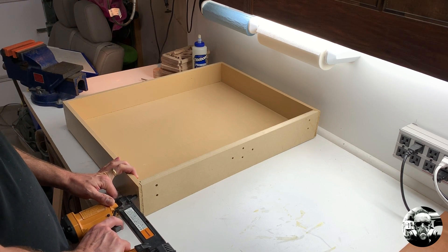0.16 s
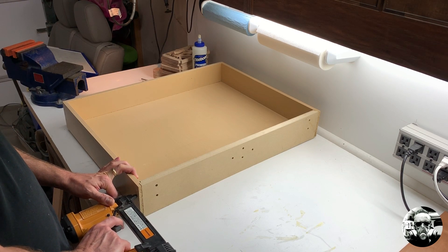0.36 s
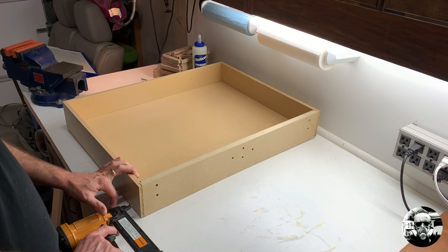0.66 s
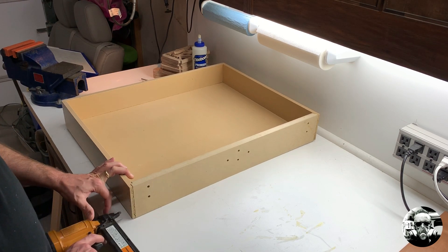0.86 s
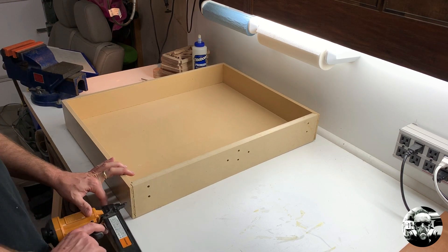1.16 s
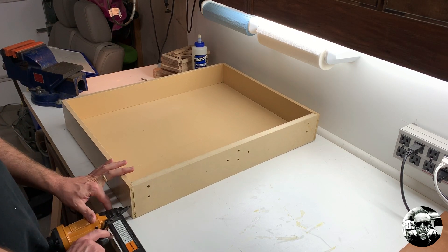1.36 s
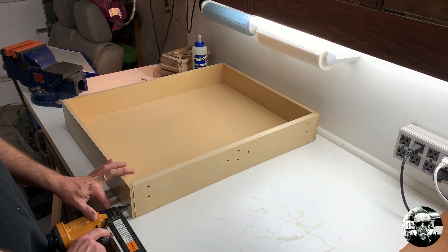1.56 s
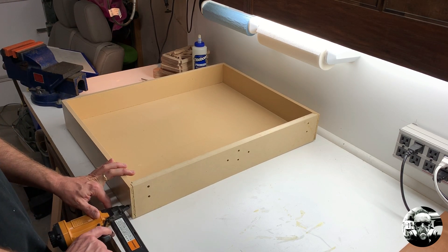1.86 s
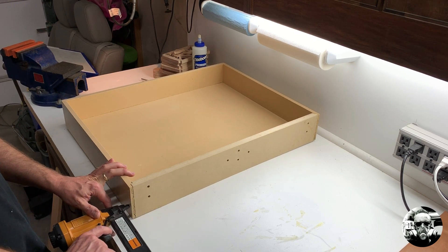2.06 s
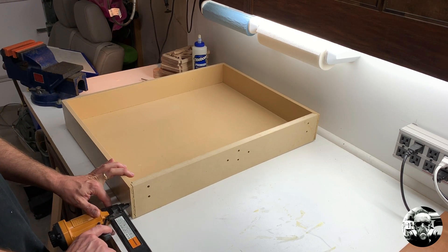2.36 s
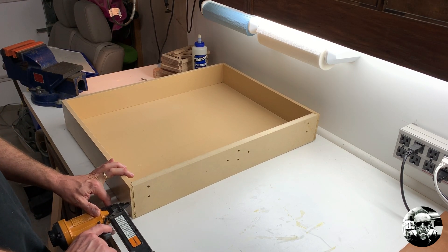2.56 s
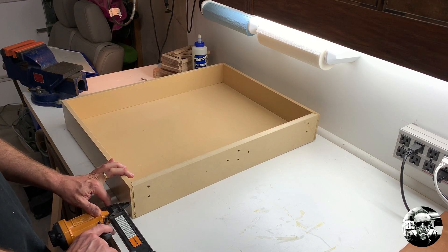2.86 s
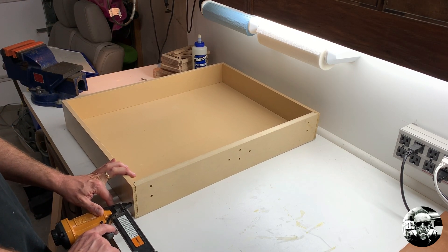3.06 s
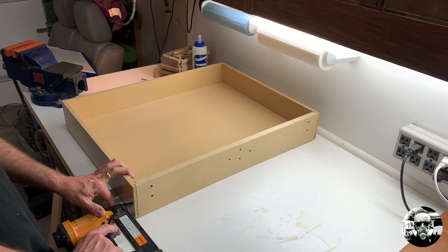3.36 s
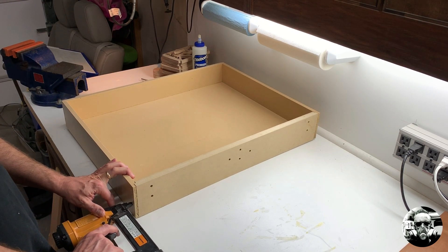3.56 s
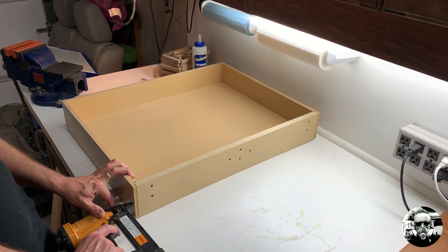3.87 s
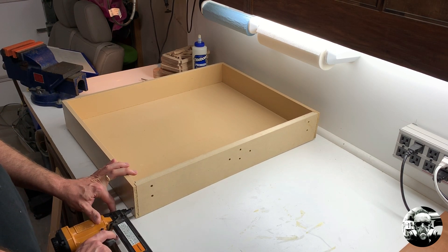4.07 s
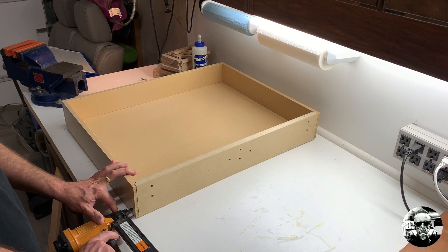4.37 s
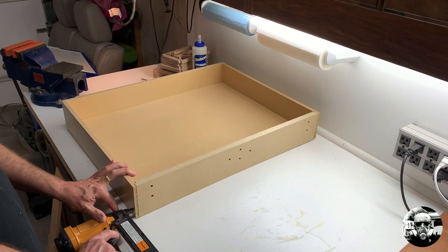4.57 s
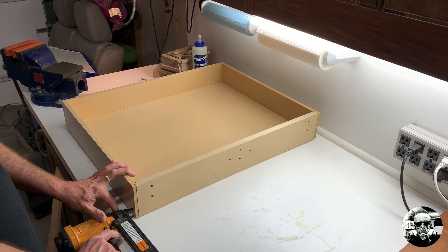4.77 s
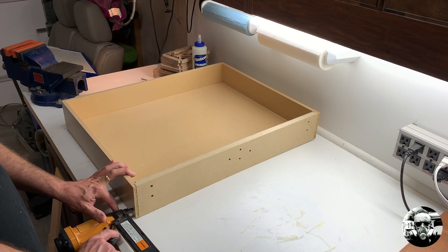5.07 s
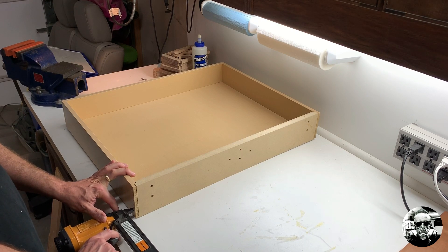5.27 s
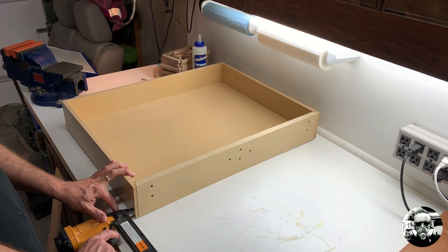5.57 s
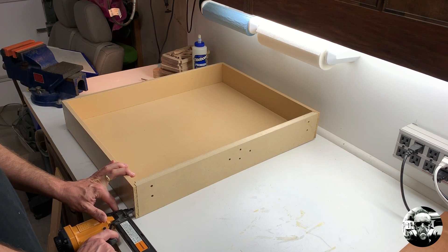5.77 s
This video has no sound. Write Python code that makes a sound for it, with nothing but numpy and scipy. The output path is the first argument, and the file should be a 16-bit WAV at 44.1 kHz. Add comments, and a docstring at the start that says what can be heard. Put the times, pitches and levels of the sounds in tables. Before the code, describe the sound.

A pneumatic nail gun fires two sharp shots into a wooden box, with hollow tool taps and low bench thumps in a small workshop.

```python
"""A pneumatic nail gun fires twice into a wooden box in a small workshop, near a pair of spaced microphones.
Each shot is a driver blow of shaped noise and box modes, then a crack, a hiss and a resonant piston knock.
Around the shots the tool taps the wood (noise through modes) and rubs it (coloured noise).
Low thumps (sinking tones) travel through the bench over an uneven noise rumble and a steady room hiss."""
import sys
import numpy as np
from scipy import signal
from scipy.fft import rfft, irfft
from scipy.io import wavfile
from scipy.ndimage import uniform_filter1d

SR = 44100
rng = np.random.default_rng(int(sys.argv[2]) if len(sys.argv) > 2 else 0)


def output_pcm(signal):
    """Save a mono or channel-first signal as 16-bit PCM at the path in sys.argv[1].

    Samples are clipped to [-1, 1] before scaling.
    """
    pcm = np.clip(np.atleast_2d(signal).T, -1, 1) * 32767
    wavfile.write(sys.argv[1], SR, np.round(pcm).astype(np.int16))


N = 261054

# Spectra are relative: a filter that uses one leaves white noise at its overall level.
# room tone spectrum: pitch_hz, level_db
AIR_SPECTRUM = [(40, -29), (118, 0.5), (240, -7), (360, -4.5), (770, -9.5), (2580, -17), (4500, -28.5),
                (7750, -38.5), (11000, -47), (13000, -40), (15200, -30.5), (16000, -30)]
# stereo balance of the room tone: pitch_hz, left_minus_right_db
AIR_BALANCE = [(60, -1.5), (240, 0), (950, -4.5), (3770, -0.5), (15000, -0.5)]
AIR_DB = -60

# bench rumble, level before its random lumps: time_s, level_db
RUMBLE_LEVEL = [(0.0, -47), (0.18, -63), (0.61, -66.5), (0.82, -56.5), (1.07, -57.5), (1.24, -62.5),
                (3.02, -62.5), (3.28, -72.5), (3.56, -68), (3.91, -61), (4.32, -62), (4.71, -57),
                (5.24, -69), (5.42, -71), (5.54, -61), (5.92, -68)]
# rumble spectrum: pitch_hz, level_db
RUMBLE_SPECTRUM = [(15, -11.5), (35, 3), (70, 1.5), (120, -7), (250, -13.5), (500, -31), (900, -56)]
# thumps through the bench, pitch at the peak: peak_s, level_db, pitch_hz, length_ms, left_minus_right_db
THUMPS = [(0.026, -47.5, 64.5, 15, -3), (0.136, -36, 63, 17, 1), (0.365, -49, 86, 11, -1),
          (0.824, -43, 53.4, 8.8, -3), (0.9, -48, 105, 16, -1), (0.938, -47, 70, 9, 3),
          (1.003, -44, 103.5, 13, -1), (1.077, -36.5, 96, 23, -2), (1.096, -38.5, 57, 12, -3),
          (1.137, -44, 87, 9, -1), (1.182, -25.5, 104, 21.4, -2.5), (1.216, -49.5, 131, 17, -3),
          (1.236, -46, 71.5, 6.7, -8), (1.398, -44, 70, 8.9, 1), (1.719, -29, 71.4, 16.3, 2),
          (1.742, -36.5, 70.4, 7.5, -4), (1.842, -48.5, 58, 7.5, -1), (2.026, -48, 60, 31, 0),
          (2.128, -33.5, 85, 12.7, 0), (2.154, -46.5, 83, 13, -3), (2.171, -45, 84, 16, 1),
          (2.506, -49, 58.2, 16, 3), (2.587, -33.5, 79, 16, 1.5), (2.89, -49, 89, 17, -1),
          (2.956, -47, 109, 25, 2), (3.19, -48.5, 109, 20, 1), (3.827, -23, 103, 8.1, 0),
          (3.858, -40, 87, 28, -1), (3.873, -36, 98, 11.5, 0), (4.283, -44.5, 88, 20, 0),
          (4.327, -56, 88, 14, -6), (4.524, -50, 85, 12, 0), (4.637, -44, 97, 48, -1),
          (4.789, -42, 70.02, 19, 0), (4.822, -28.5, 91, 14.3, 1), (5.367, -46, 82.8, 16.3, 7),
          (5.398, -37, 83, 6.1, 0), (5.424, -39, 58.6, 32, 2.5)]
# spectrum of the dull noise ahead of a thump: pitch_hz, level_db
DULL_SPECTRUM = [(90, -44), (170, 5.5), (300, -3.5), (450, -6.5), (650, -38), (1200, -67)]
EARLY_DB, EARLY_S = -16, 0.0041  # dull part: level against the thump, lead
# slow deep tone behind a thump: level at the pivot pitch, pitch, delay
DEEP_DB, DEEP_HZ, DEEP_LATE_S = -11.5, 41.8, 0.006
DEEP_RISE_S, DEEP_FALL_S = 0.02, 0.032
DEEP_PIVOT_HZ, DEEP_DB_PER_OCTAVE = 80, -5  # higher thumps carry less of it
PHASE_SAG_PER_S = 11.8  # near the peak the pitch falls by twice this share per second
# fainter thumps agree less between the microphones
FIRM_DB, ALIKE_FIRM, ALIKE_LOSS_PER_DB = -31, 0.88, 0.06

# shots: blow_s, blow_db, exhaust_s, crack_db, crack_length_s, hiss_db,
# then the returning piston: knock_s, knock_db, knock_length_s, knock_pitch_hz
SHOTS = [(0.613, -28, 0.6805, -20, 0.0033, -26, .691, -10, 0.0067, 681.6),
         (3.959, -28, 4.014, -23, 0.011, -26, 4.018, -15.5, 0.038, 370)]
# spectrum of the blow: pitch_hz, level_db
BLOW_SPECTRUM = [(60, -5), (150, -5.5), (400, -8), (1500, -3), (2500, -6.5), (4000, -7), (8000, -15.5),
                 (12000, -16), (16000, -22)]
# spectrum of its bright edge: pitch_hz, level_db
SNAP_SPECTRUM = [(2000, -18), (5000, -9.5), (8000, 2.5), (11000, 1), (14000, 0.5), (16000, -11.5)]
# spectrum of the exhaust hiss: pitch_hz, level_db
HISS_SPECTRUM = [(60, -2), (300, -6.5), (1000, -5.5), (2500, -8), (5500, -7.5), (7500, -6), (10000, -3.5),
                 (13000, -7), (16000, -12)]
# spectrum of the exhaust crack: pitch_hz, level_db
CRACK_SPECTRUM = [(1000, -31.5), (4000, -8.5), (5800, -19), (6800, 3.5), (10000, 2), (13000, 4.5),
                  (16000, -8.5)]
# modes of the wooden box: pitch_hz, width_hz, level_db
BOX_MODES = [(105, 40, 5), (363, 44, 1.5), (419, 42.5, -0.5), (650, 61, 5), (996.3, 120, -11.5),
             (1390, 90, -14), (1890, 120, -6.5)]
HISS_HOLD_S = 0.034
GUN_LAG_S, TAP_LAG_S = 0.000143, 0.000025  # the tool is nearer the right microphone: delay on the left

# decay of the workshop tail: pitch_hz, t60_s
SHOP_DECAY = [(250, 0.36), (660, 0.3), (1740, 0.28), (4590, 0.28), (12100, 0.16)]

# tool against wood: start_s, level_db, contact_pitch_hz, treble_db (against level), length_ms,
# ring_db (against level)
TAPS = [(0.900, -23, 3000, -22.5, 1.3, -5), (1.057, -40, 1000, -19, 7.9, -16),
        (1.075, -27, 2140, -18, 3.5, -7), (1.140, -35.5, 2100, -24, 5.5, -28),
        (1.173, -22, 1480, -21, 2.2, -4), (1.387, -32.5, 1595, -22.5, 5.5, -25),
        (1.480, -38.5, 1510, -15.5, 6.1, -19), (4.207, -37.5, 1440, -26, 4.3, -15),
        (4.575, -39.5, 2520, -28, 4.3, -10)]
# modes of tool and board while struck: pitch_hz, width_hz, level_db
TOOL_MODES = [(1130, 440, -2.5), (1456, 237, 1.5), (1900, 120, -25), (3060, 110, -5.5), (5000, 2600, -23.5)]
# treble of the taps: pitch_hz, level_db
TICK_SPECTRUM = [(2000, -34), (4000, -17), (6000, -7), (7500, 3.5), (9200, 3), (10500, -35), (13000, -1),
                 (16000, -8)]
# rubbing on the wood: time_s, level_db
RUB_LEVEL = [(.84, -63), (.97, -80), (1.03, -60), (1.16, -62), (1.22, -85), (1.28, -66.5), (1.36, -72),
             (1.42, -63), (1.6, -88)]
# spectrum of the rubbing: pitch_hz, level_db
RUB_SPECTRUM = [(300, -8.5), (1500, -4), (3000, -5.5), (6000, -6.5), (10000, -9.5), (16000, -10.5)]

EDGE_HZ = 15850  # top of the band


def gain_of(db):
    """Decibels to a factor."""
    return 10 ** (np.asarray(db) / 20)


def read(points, hz):
    """A table's values at the frequencies hz, interpolated along log frequency."""
    f, value = np.transpose(points)
    return np.interp(np.log(hz + 1), np.log(f + 1), value)


def colour(x, points):
    """Filters x by a spectrum that leaves white noise at its level."""
    gain = gain_of(read(points, np.fft.rfftfreq(N, 1 / SR)))
    return irfft(rfft(x) * gain / np.sqrt(np.mean(gain ** 2)), N)


def resonate(x, hz, width):
    """A resonance with gain 1 at its peak."""
    return signal.lfilter(*signal.iirpeak(hz, hz / width, SR), x)


def burst(s, db, rise_db, fall_db, hold=0., sag_db=0.):
    """Envelope: swells to db at s, sags for the time hold, then dies; slopes in dB a second."""
    t = np.arange(N) / SR - s
    swell = rise_db * np.minimum(t, 0)
    sag = sag_db * np.clip(t, 0, hold)
    fall = fall_db * np.maximum(t - hold, 0)
    return gain_of(db + swell - sag - fall)


def curve(rows, off_db=-120):
    """A level curve as gain at every sample, at off_db outside its span."""
    s, db = np.transpose(rows)
    return gain_of(np.interp(np.arange(N) / SR, s, db, off_db, off_db))


def grit(spread_db):
    """Noise of uneven 40-sample grains, rms 1."""
    grain_db = spread_db * np.repeat(rng.standard_normal(N // 40 + 1), 40)[:N]
    x = rng.standard_normal(N) * gain_of(grain_db)
    return x / x.std()


def room_tone():
    """Steady coloured hiss, unrelated between the microphones."""
    hz = np.fft.rfftfreq(N, 1 / SR)
    hiss = colour(rng.standard_normal((2, N)), AIR_SPECTRUM)
    balance = gain_of(np.array([[.5], [-.5]]) * read(AIR_BALANCE, hz))
    return gain_of(AIR_DB) * irfft(rfft(hiss) * balance, N)


def rumble():
    """Low noise under the thumps, partly shared by the microphones, its level wandering in lumps."""
    both, left, right = (grit(0.) for _ in range(3))
    lumps = gain_of(160 * uniform_filter1d(rng.standard_normal((2, N)), 1600))
    noise = 0.69 * both + 0.92 * np.array([left, right])
    return curve(RUMBLE_LEVEL) * lumps * colour(noise, RUMBLE_SPECTRUM)


def thumps():
    """Bending waves in the bench arrive high first, low last: dull noise, a sinking tone, a deep tone."""
    out = np.zeros((2, N))
    dull = colour(0.8 * grit(0.) + 0.54 * rng.standard_normal((2, N)), DULL_SPECTRUM)
    leads = rng.choice([-1., 1.], len(THUMPS))
    for (s, db, hz, ms, pan_db), lead in zip(THUMPS, leads):
        at = np.arange(max(round((s - .1) * SR), 0), round((s + 0.09) * SR))
        t = at / SR - s
        half = ms / 1000 / 2

        # the two microphones shake out of step
        alike = np.clip(ALIKE_FIRM - ALIKE_LOSS_PER_DB * max(FIRM_DB - db, 0), -.8, 1)
        apart = lead * np.arccos(alike) / 2 * np.array([[1], [-1]])

        turns = hz * t * (1 - PHASE_SAG_PER_S * np.clip(t, -.04, .04)) + 0.063
        waves = np.exp(-(t / half) ** 2) * np.cos(2 * np.pi * turns + apart) / np.cos(apart)

        early = gain_of(EARLY_DB) * np.exp(-((t + EARLY_S) / (2 * half)) ** 2) * dull[:, at]

        deep_db = DEEP_DB + DEEP_DB_PER_OCTAVE * np.log2(hz / DEEP_PIVOT_HZ)
        spread = np.where(t < DEEP_LATE_S, DEEP_RISE_S, DEEP_FALL_S)
        swell = gain_of(deep_db) * np.exp(-((t - DEEP_LATE_S) / spread) ** 2)
        deep = swell * np.sin(2 * np.pi * DEEP_HZ * t + apart) / np.cos(apart)

        level = gain_of(db + np.array([[.5], [-.5]]) * pan_db)
        out[:, at] += level * (waves + early + deep)
    return out


def gun():
    """Compressed air drives each blow and vents: the blow and hiss, and apart the sharp crack and knock."""
    blow, snap, crack, hiss = np.zeros((4, N))
    for blow_s, blow_db, exhaust_s, crack_db, crack_hold, hiss_db, *_ in SHOTS:
        # the valve opens with a swelling rush, then the driver lands
        blow += burst(blow_s + 0.0036, blow_db, 3500, 407.0, exhaust_s - blow_s, 80)
        blow += burst(blow_s, blow_db - 3.0, 1760, 700)
        snap += burst(blow_s + 0.0045, blow_db, 1700, 370)
        crack += burst(exhaust_s, crack_db, 19990, 1100, crack_hold, 300.5)
        hiss += burst(exhaust_s + .006, hiss_db, 1500, 320, HISS_HOLD_S, 40)

    drive = gain_of(6) * blow * grit(1.5)
    body = colour(grit(2.2), BLOW_SPECTRUM) * blow
    body += colour(grit(1.5), SNAP_SPECTRUM) * snap
    body += colour(grit(1.3), HISS_SPECTRUM) * hiss
    for hz, width, mode_db in BOX_MODES:
        body += gain_of(mode_db) * resonate(drive, hz, width)

    sharp = colour(grit(1.9), CRACK_SPECTRUM) * crack
    rattle = grit(0.)
    for *_, knock_s, knock_db, hold, knock_hz in SHOTS:
        knock = burst(knock_s, knock_db, 3000, 1500, hold) * rattle
        for hz, width, mode_db in BOX_MODES:
            # modes near the pitch of the knock are struck hardest
            near_db = -10.0 * abs(np.log2(hz / knock_hz))
            sharp += gain_of(mode_db + near_db) * resonate(knock, hz, width)
    return body, sharp


def shop(x, wet_db, dry_db, lag_s):
    """Direct sound, later on the left, plus a tail of sparse reflections that differs between the microphones."""
    length = SR // 2
    marks = np.zeros((2, length))
    # one reflection of random sign in every 20 samples
    at = np.arange(60, length - 20, 20) + rng.integers(0, 20, (2, (length - 61) // 20))
    np.put_along_axis(marks, at, rng.choice([-1., 1.], at.shape), 1)
    hz, t, z = signal.stft(marks, SR, nperseg=256)
    decay = gain_of(-60 * t / read(SHOP_DECAY, hz)[:, None])
    tail = signal.istft(z * decay, SR, nperseg=256)[1]
    wet = signal.fftconvolve(x[None], tail / np.linalg.norm(tail[0]), axes=1)[:, :N]
    # a phase slope delays by any time, not only whole samples
    late = irfft(rfft(x) * np.exp(-2j * np.pi * np.fft.rfftfreq(N, 1 / SR) * lag_s), N)
    return gain_of(dry_db) * np.array([late, x]) + gain_of(wet_db) * wet


def rubbing():
    """The tool rubs the wood: gritty coloured noise under a level curve."""
    return curve(RUB_LEVEL) * colour(grit(1.5), RUB_SPECTRUM)


def taps():
    """A short rattle of the tool on wood: hollow modes that ring on faintly, and a metallic treble tick."""
    treble, rattle = colour(grit(1.9), TICK_SPECTRUM), grit(0.)
    struck = [resonate(rattle, hz, width) for hz, width, _ in TOOL_MODES]
    ringing = [resonate(rattle, hz, width * 0.69) for hz, width, _ in TOOL_MODES]  # narrower
    out = np.zeros(N)
    for s, db, contact_hz, treble_db, ms, ring_db in TAPS:
        shape = burst(s, db, 2270, 2500, ms / 1000, 390)
        ring = burst(s + ms / 1000, db + ring_db, 3000, 400)
        for (hz, _, mode_db), hit, tone in zip(TOOL_MODES, struck, ringing):
            # modes near the pitch of the contact are struck hardest
            near_db = -8.0 * abs(np.log2(hz / contact_hz))
            mode = shape * hit + gain_of(2 * near_db) * ring * tone
            out += gain_of(mode_db + near_db) * mode
        out += gain_of(treble_db) * shape * treble
    return out


def scene():
    """All sources; crack, knock, taps and rubbing come most directly."""
    body, sharp = gun()
    shots = shop(body, -3.5, -6.0, GUN_LAG_S) + shop(sharp, -6, 0., GUN_LAG_S)
    contact = shop(rubbing() + taps(), -8.5, 0., TAP_LAG_S)
    return room_tone() + rumble() + thumps() + shots + contact


def record(dry):
    """The band limit: a steep low-pass at EDGE_HZ."""
    low_pass = signal.firwin(511, EDGE_HZ, window=("kaiser", 9), fs=SR)
    return signal.oaconvolve(dry, low_pass[None], "same")


dry = scene()
out = record(dry)
output_pcm(out)
```